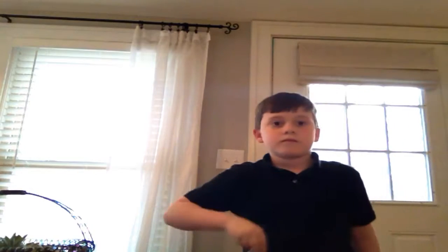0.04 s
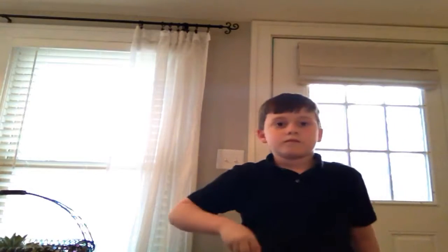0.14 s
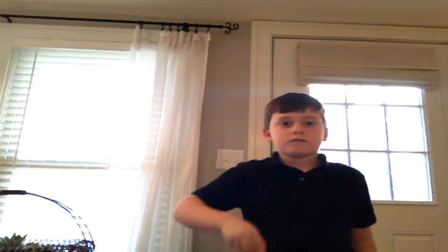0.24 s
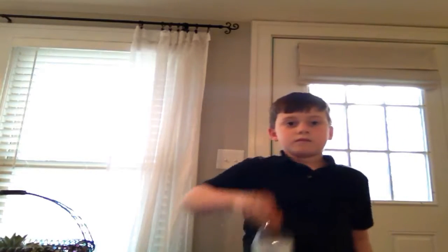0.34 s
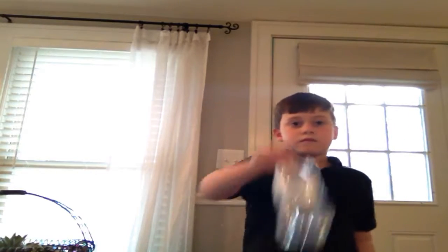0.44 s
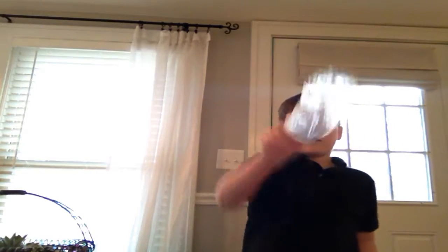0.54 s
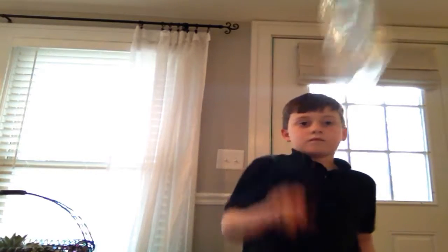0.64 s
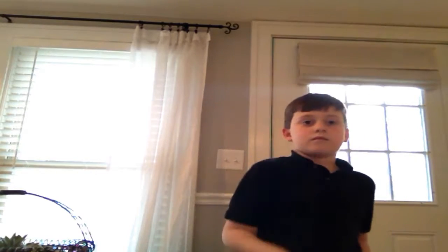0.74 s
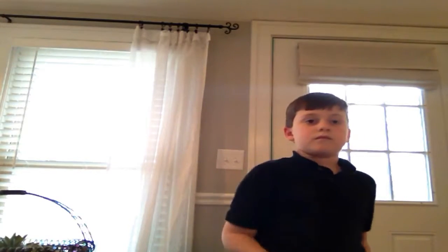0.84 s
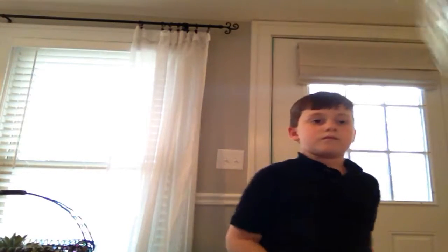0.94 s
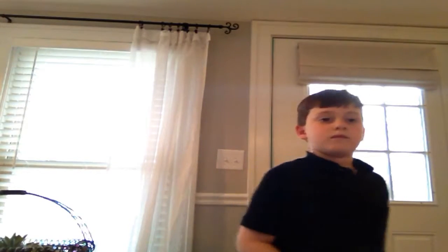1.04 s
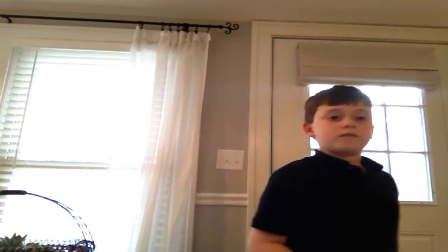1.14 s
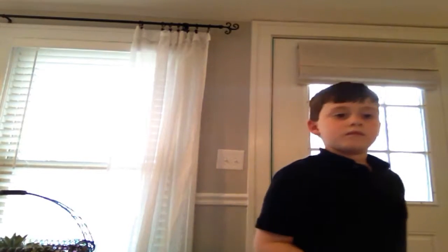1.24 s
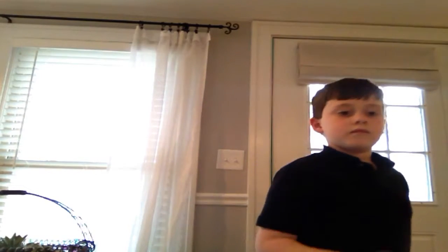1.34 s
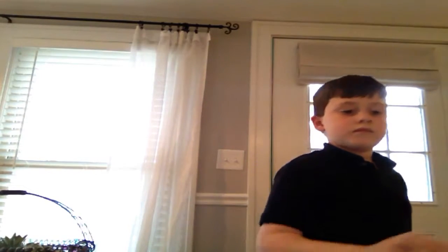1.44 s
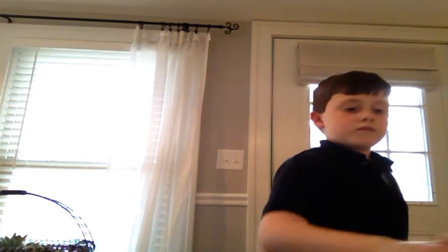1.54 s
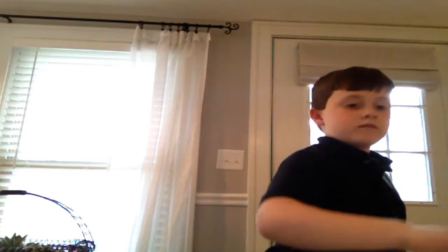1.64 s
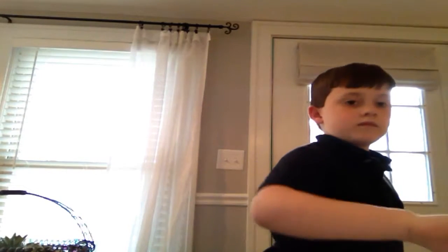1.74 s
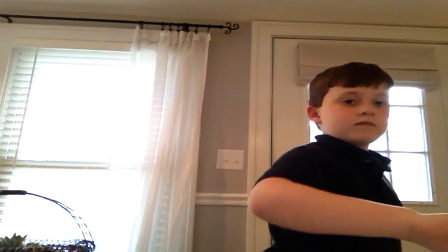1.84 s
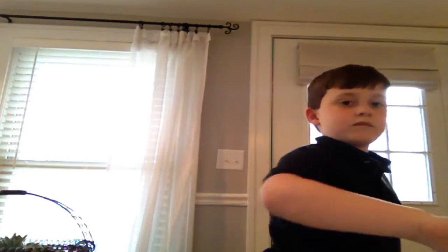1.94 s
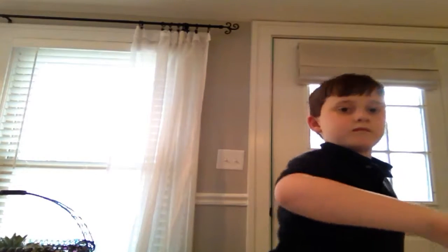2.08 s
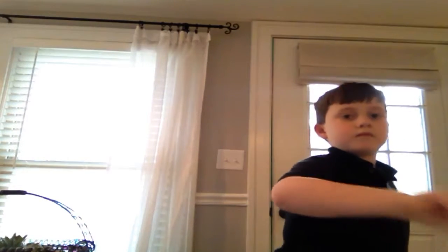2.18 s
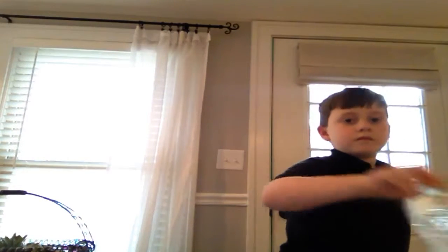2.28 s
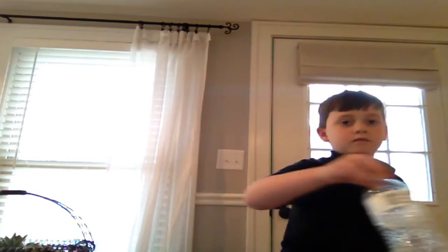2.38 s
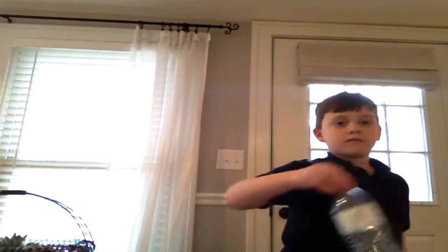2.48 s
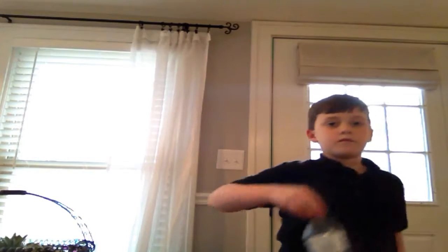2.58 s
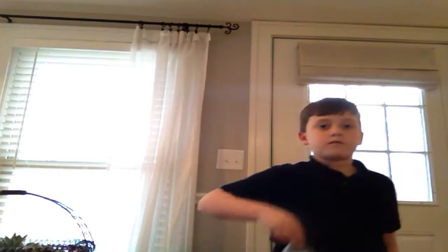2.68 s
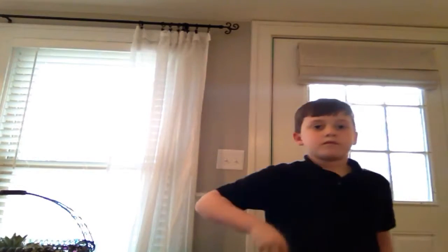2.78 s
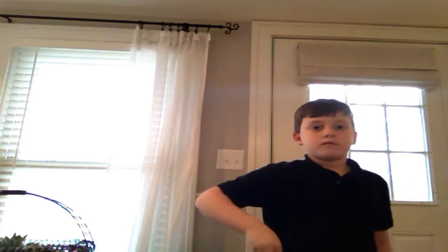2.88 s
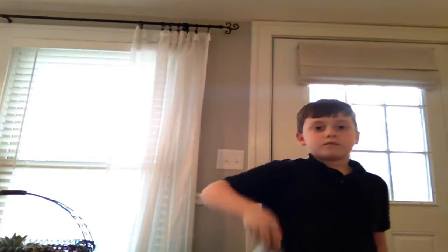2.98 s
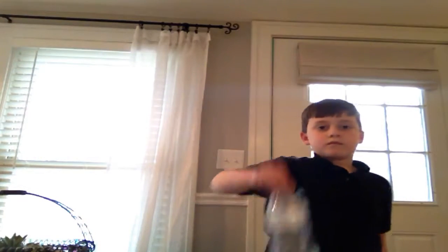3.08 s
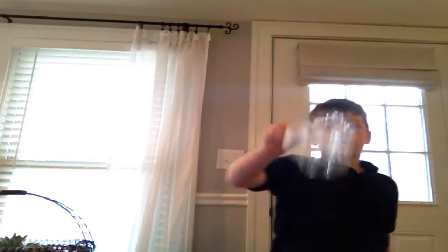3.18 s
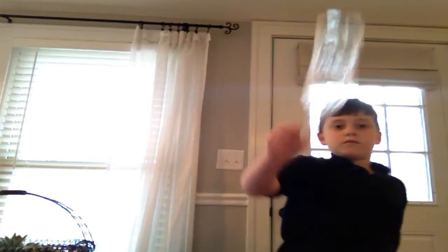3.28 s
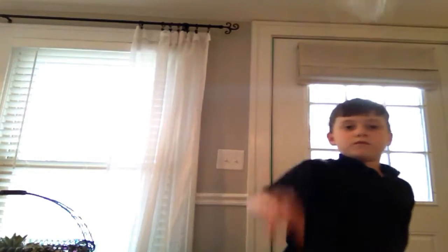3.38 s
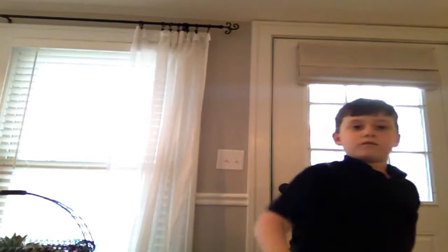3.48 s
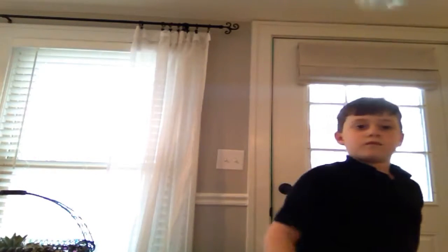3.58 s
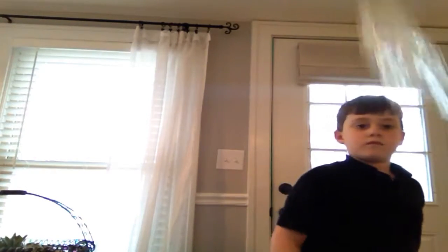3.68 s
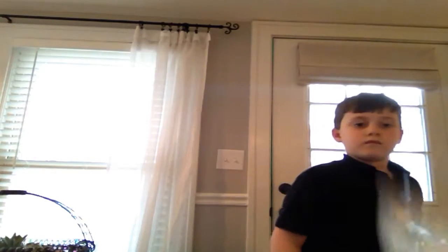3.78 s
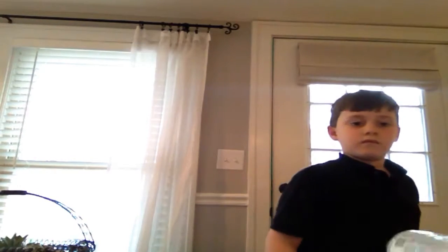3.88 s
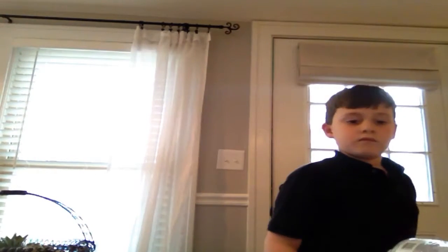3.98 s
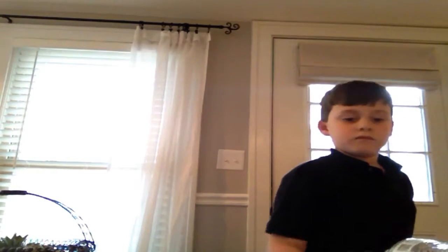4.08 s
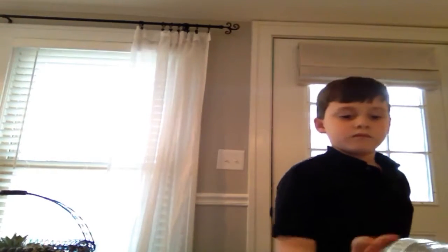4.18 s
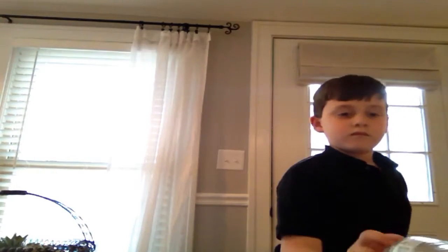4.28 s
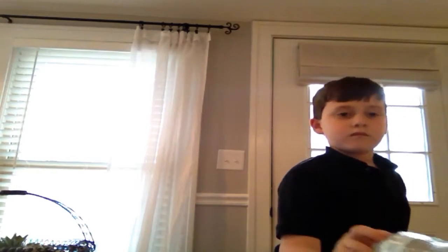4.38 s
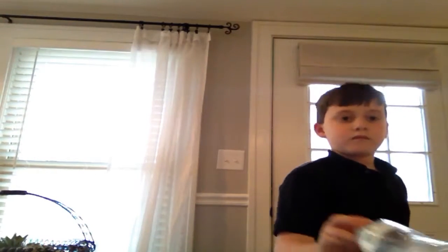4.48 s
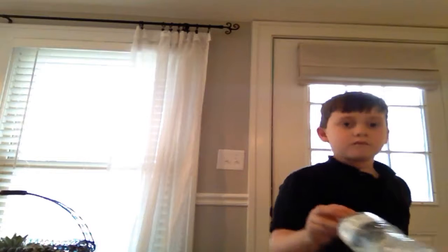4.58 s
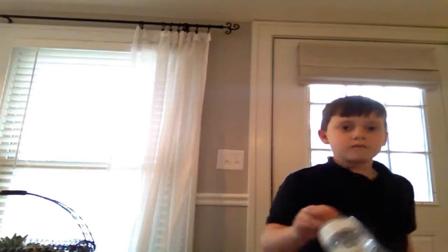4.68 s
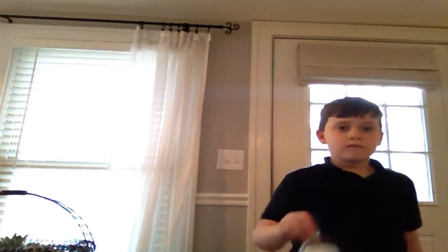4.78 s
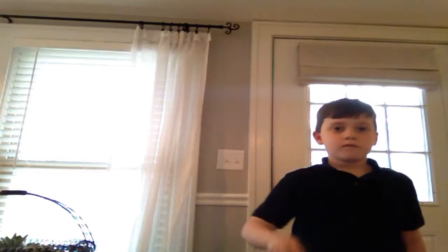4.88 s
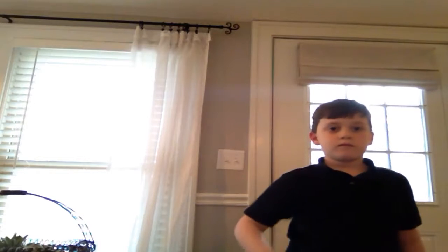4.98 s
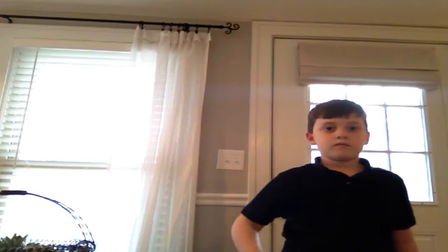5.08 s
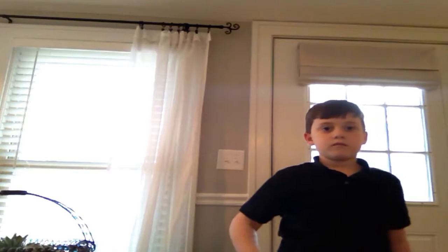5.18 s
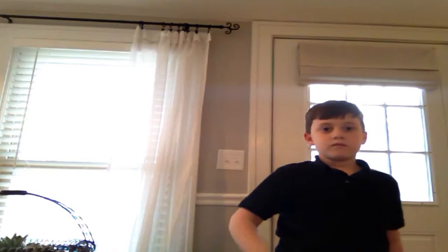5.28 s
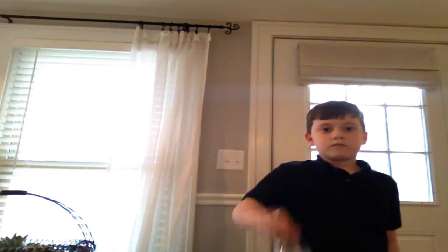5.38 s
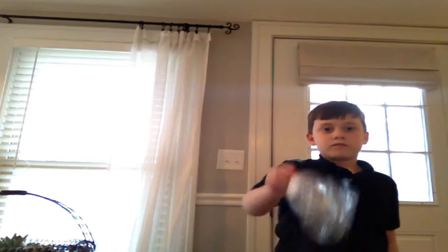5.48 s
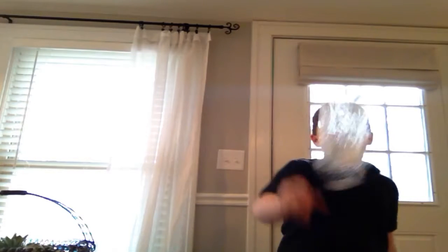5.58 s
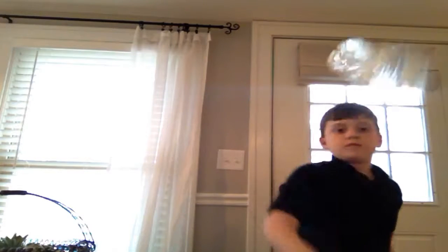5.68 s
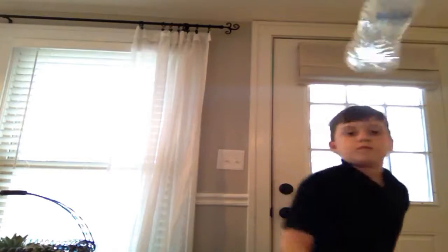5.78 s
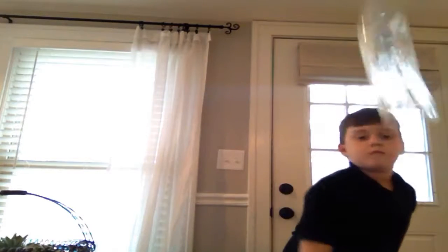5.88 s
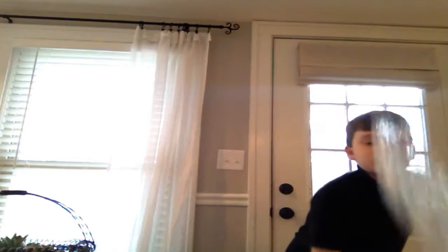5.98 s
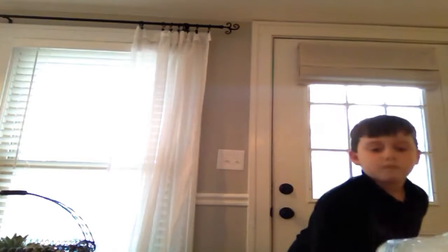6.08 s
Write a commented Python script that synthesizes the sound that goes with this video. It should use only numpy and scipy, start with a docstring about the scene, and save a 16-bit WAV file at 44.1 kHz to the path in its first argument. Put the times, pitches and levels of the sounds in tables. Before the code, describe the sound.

A low appliance hum with a soft fan rush runs throughout in a small, echoing room. At about 0.2 seconds a plastic bottle scuffs faintly on a table, followed by a soft swish. At 1.0 it lands with a sharp plastic crunch, a table thump and a short, hollow slap of water, bouncing more lightly at 1.3. Around 2.1 the shell snaps quietly as it is gripped, and faint rustles follow. The second landing, a loud cluster of cracks and thuds, comes at 3.7, with a small knock at 3.9. Soft rustling and crinkling continue from 4 to 5 seconds, then a few light snaps near 5.5. The third landing hits just before 6.0 with a quick clatter and a last weak tap at 6.1. Very faint drops tick inside the bottle just before each landing, and every impact leaves a brief echo.

```python
"""In a small, echoing room, a partly filled plastic water bottle is flipped onto a table three times.
Each landing crumples the thin shell for a moment, thumps the table top and slams the water into the
base; the bottle bounces and topples. Before and between throws it is scuffed along, gripped and swung,
and drops tick inside it as it flies. An appliance hums steadily in the background."""
import sys
import numpy as np
from scipy import signal
from scipy.fft import rfft, irfft
from scipy.io import wavfile
from scipy.ndimage import uniform_filter1d

SR = 44100
rng = np.random.default_rng(int(sys.argv[2]) if len(sys.argv) > 2 else 0)


def dump_mix(stems):
    """Bounce the given channels to the path in sys.argv[1] as a 16-bit WAV at rate SR."""
    frames = np.atleast_2d(stems).T  # one column per channel
    limited = np.clip(frames, -1, 1)  # hard clip at full scale
    pcm = np.round(limited * 32767).astype(np.int16)
    wavfile.write(sys.argv[1], SR, pcm)


N = 270333

# the bottle hits the table: t/s, crack level/dB, crumple length/s, thump level/dB,
# squareness (0 = on the thin wall, 1 = flat on the stiff base)
HITS = [ (0.997, -14.5, 0.0036, -19.5, 0.96), (1.0006, -7, 0.0043, -18.5, 0.94),
        (1.287, -20.5, 0.0014, -24.5, 0.76), (1.2932, -20, 0.0016, -49, 0.86),
        (3.719, -14, 0.0082, -17.5, 0.38), (3.75, -6, 0.00063, -15, 0.33),
        (3.766, -20, 0.0081, -18.5, 0.67), (3.878, -30, 0.0038, -52, 1), (3.899, -30.5, 0.0026, -25.5, .65),
        (5.9526, -14.5, 0.0046, -25, 0.91), (5.961, -26.5, 0.018, -15.5, 0.5),
        (6.0105, -20, 0.0011, -45, .35), (6.0141, -18.5, .0015, -29, 0.045), (6.032, -26, .002, -50, 0.092),
        (6.1212, -35.5, .0024, -50, 0.37), ]
# the notes the table top rings at, with the bottle on it: f/Hz, level/dB, time to fade by 60 dB/s
TABLE_NOTES = [(105.9, -29, 0.11), (143.8, -10.5, 0.11), (172, -17, 0.24), (230.7, -12, 0.32),
               (280, -9, 0.13), (365, -12.5, 0.14), (379, -13, 0.19), (413, -9.5, 0.22), (505, -6.5, 0.22),
               (564.3, -7, 0.086), (660, -3.5, 0.018), (729.7, -8.5, 0.14), (823, -8, 0.031),
               (1171, -11, 0.05), (1438, -12, 0.12), (1684, -20, 0.062), (1890, 2.5, 0.042)]
# tone of the crumpling shell: f/Hz, level/dB
SHELL_TONE = [(60, -40), (130, -7), (400, 3), (800, 2), (1200, -0.5), (1950, -1), (2400, -4), (2900, -3),
              (3500, -4), (4300, -4), (6200, -12), (7600, -12.5), (9500, -14), (16000, -17)]

def landings(size=32768):
    """Each hit buckles the shell in a burst of clicks and sets the table ringing; the room echoes both."""
    buckle_rise_s, buckle_fade_s = .0003, .02
    out, t = np.zeros(N), np.arange(size) / SR
    table = sum(undb(db) * np.sin(2 * np.pi * hz * t) * fade(t, fade_s) * (-1) ** k
                for k, (hz, db, fade_s) in enumerate(TABLE_NOTES))
    for s, crack_db, crumple_s, thump_db, squareness in HITS:
        # the wall sounds bright and gives way; the base sounds dull and stops at once
        tilt_db = np.interp(squareness, [0, 1], [1, -1.56])
        contact_s = np.interp(squareness, [0, 1], [.0023, .0001])
        # the wall keeps buckling while the bottle is stopped, then dies away quickly
        buckling = (1 - np.exp(-t / buckle_rise_s)) * fade(np.maximum(t - crumple_s, 0), buckle_fade_s)
        shell = undb(crack_db) * np.linalg.norm(buckling) * tone_filter(SHELL_TONE, tilt_db)
        crack = convolve(unit(clicks(size, spread_db=3.0) * buckling), shell)
        # a longer contact is a softer push that leaves out the table's high notes
        push = t * fade(t, 2 * contact_s)
        thump = undb(thump_db) * convolve(table, push / push.sum())
        # every hit falls on a new spot with its own echoes; in them the clicks merge into one crack
        echoes = room_echoes(size)
        add(out, s, crack + thump + convolve(echoes, shell) + convolve(echoes, thump))
    return out


# water slams into the base and a pocket of air rings: t/s, f/Hz, level/dB
AIR_POCKETS = [(.999, 320, -17), (1.005, 546, -10), (1.006, 395.5, -12), (1.288, 840, -21),
               (3.723, 457, -13.5), (3.751, 360, -16.5), (5.958, 320, -21.5), (5.959, 553, -17.5)]

def water_slaps(rise_s=.00081, fade_cycles=30):
    """The water lands with the bottle and rings the air it traps; small, high pockets die sooner."""
    out, t = np.zeros(N), np.arange(SR // 2) / SR
    for s, hz, db in AIR_POCKETS:
        loudness = undb(db) * (1 - np.exp(-t / rise_s)) * fade(t, fade_cycles / hz)
        add(out, s, loudness * np.sin(2 * np.pi * hz * t))
    return out


# the shell snaps as it is gripped, settles or is let go: t/s, level/dB, f/Hz, sharpness (Q)
SNAPS = [(2.038, -37.5, 660, 3.4), (2.04, -43, 1540, 2), (2.074, -44, 1990, 1.5), (2.096, -39, 3110, 1.6),
         (2.097, -41, 1655, 3), (3.925, -47.5, 6660, 13), (4.429, -47.5, 3960, 5), (5.469, -44, 1970, 1.2),
         (5.486, -39.5, 2700, 2.2), (5.4888, -40.5, 4086, 24), (5.488, -47, 5720, 8)]

def shell_snaps():
    """The clearest snaps of the plastic, each ringing one patch of the shell."""
    out = np.zeros(N)
    for s, db, hz, q in SNAPS:
        add(out, s, undb(db) * tick(hz, q))
    return out


def tick(hz, q, size=4096):
    """A patch of shell rings; the more it flexes (low q), the more it wavers and the sooner it dies."""
    t, width_hz = np.arange(size) / SR, hz / q
    wander = np.cumsum(rng.standard_normal(size)) * np.sqrt(2 * np.pi * width_hz / SR)
    ring = resonate(np.sin(2 * np.pi * hz * t + wander), hz, 2 * width_hz)
    return ring / ring.std() * fade(t, fade_s=.027 * q ** .22)


# the base scuffs back and forth: loudest t/s, level/dB, ring f/Hz, ring level before halving/dB
SCUFF_STROKES = [(.201, -46, 5000, 6.5), (.335, -44.5, 2037, 10)]
# tone of the rubbing: f/Hz, level/dB
SCUFF_TONE = [(300, -8.5), (900, 5.5), (1250, -2), (1700, 2), (2400, -2.5), (2750, 2.5), (3500, 0.5),
              (4700, 3.5), (6000, 0), (7500, 1.5), (11000, 0), (16000, -4.5)]

def scuffs(q=2.1):
    """Rubbing on the table makes fine clicks; the shell rings differently on the pull and the push."""
    out = np.zeros(N)
    for s, db, hz, ring_db in SCUFF_STROKES:
        rub = convolve(clicks(N, spread_db=2.0), tone_filter(SCUFF_TONE))
        ring = undb(ring_db) * resonate(rub, hz, hz / q) / 2
        out += undb(db) * stroke(s, rise_s=.021, fall_s=.076) * (rub + ring)
    return out


# the arm moves the bottle, rustling and sloshing: loudest t/s, length/s, level/dB, f/Hz
ARM_MOVES = [(0.463, 0.057, -54.5, 3370), (2.163, 0.16, -58, 2300), (2.276, .045, -59.5, 5000),
             (2.42, .09, -63.5, 1370), (3.15, 0.036, -56, 3670), (3.648, .11, -54, 1500),
             (4.03, 0.035, -54.5, 4200), (4.173, 0.25, -64, 2000), (4.452, 0.2, -59, 2500),
             (4.885, 0.058, -61.5, 3300)]

def rustles(crinkles_per_move=3, swish_q=1.7):
    """A soft, grainy swish follows each arm movement, and the gripped shell crinkles at random."""
    crinkle_db, spread_db, spread_octaves = -3.5, 5.5, .502  # compared with the swish
    out, grain = np.zeros(N), clicks(N, spread_db=7.5)
    for s, length_s, db, hz in ARM_MOVES:
        rise_s = .33 * length_s  # the arm speeds up faster than it slows
        swish = resonate(grain, hz, hz / swish_q)
        out += undb(db) * stroke(s, rise_s, length_s - rise_s) * swish / swish.std()
        for when, strength, pitch in rng.uniform(-1.1, 1, (crinkles_per_move, 3)):
            gain = undb(db + crinkle_db + spread_db * strength)
            crinkle = tick(hz * 2 ** (spread_octaves * pitch), q=3.1)
            add(out, s - rise_s + length_s * (1 + when) / 2, gain * crinkle)
    return out


# the bottle tumbles down through the air: start t/s, end t/s
FLIGHT_TIMES = [(.82, .92), (3.46, 3.62), (5.76, 5.94)]

def drips(drops_per_flight=3, level_db=-55, middle_hz=4600, spread_octaves=.6):
    """A few drops strike the bottle's wall at random moments of each flight."""
    out = np.zeros(N)
    for start_s, end_s in FLIGHT_TIMES:
        for when, pitch in rng.random((drops_per_flight, 2)):
            hz = middle_hz * 2 ** (spread_octaves * (2 * pitch - 1))
            add(out, start_s + when * (end_s - start_s), undb(level_db) * tick(hz, q=7))
    return out


# how long the room echoes: f/Hz, time to fade by 60 dB/s
ECHO_TIMES = [(120, 0.622), (500, 0.56), (2000, 0.63), (5000, 0.65), (9000, 0.48), (16000, .3)]
# how strongly the room echoes: f/Hz, level/dB
ECHO_LEVELS = [(120, -4), (400, 2), (1000, -2.5), (3000, -5.5), (8000, -3.5), (16000, -11)]

def room_echoes(size=32768, early_db=8, early_fade_s=.37):
    """Near surfaces answer first and loudest; a wash of echoes follows and loses its top treble first."""
    t = np.arange(size) / SR
    spectrum, hz = rfft(rng.standard_normal(size)), np.fft.rfftfreq(size, 1 / SR)
    centres_hz = np.geomspace(125, 16000, 8)
    build_up = np.clip((t - .003) / .0055, 0, 1) * (1 + undb(early_db) * fade(t, early_fade_s))
    echoes = np.zeros(size)
    for centre, weights in zip(centres_hz, np.eye(len(centres_hz))):
        band = irfft(spectrum * look_up(np.c_[centres_hz, weights], hz))
        decay = unit(build_up * fade(t, look_up(ECHO_TIMES, centre)))
        echoes += undb(look_up(ECHO_LEVELS, centre)) * band * decay
    return echoes


# the notes of the hum: multiple of the mains frequency, level/dB
HUM_NOTES = [(2, -73.5), (4, -49.5), (6, -63), (8, -62.5)]
# tone of the fan's rush and hiss: f/Hz, level/dB
FAN_TONE = [(30, -45), (45, -35), (60, -18.5), (95, -29.5), (115, -5), (145, 1), (190, -8), (280, -2),
            (420, -7), (600, -14), (1000, -19), (2200, -26), (5000, -30), (16000, -32.5)]

def appliance(mains_hz=59.95, fan_db=-53.5):
    """A motor hums on mains power and wavers a little, over the rush of its fan."""
    hum, t = np.zeros(N), np.arange(N) / SR
    for multiple, db in HUM_NOTES:
        gain = undb(db + 1.6 * drift(rate_hz=11)) * np.sqrt(2)
        hum += gain * np.sin(2 * np.pi * (round(multiple) * mains_hz * t + rng.random()))
    rush = convolve(rng.standard_normal(N), tone_filter(FAN_TONE))
    return hum + rush * undb(fan_db + .73 * drift(rate_hz=8.5))


def undb(db):
    """Turn decibels into a number to multiply by."""
    return 10 ** (np.asarray(db) / 20)


def look_up(points, hz):
    """Read between the rows of a (frequency, value) table, with octaves evenly spaced."""
    f, value = np.transpose(points)
    return np.interp(np.log(np.maximum(hz, 1)), np.log(f), value)


def unit(x):
    """Scale a sound so that its energy is 1."""
    return x / np.sqrt(np.sum(x ** 2))


def add(track, s, sound):
    """Mix a sound into the track at s seconds."""
    i = max(int(s * SR), 0)
    track[i:i + len(sound)] += sound[:max(len(track) - i, 0)]


def convolve(x, response):
    """Pass a sound through a filter, keeping its length."""
    return signal.fftconvolve(x, response)[:len(x)]


def tone_filter(points, tilt_db=0, size=4096):
    """Make a filter from a tone table, brighter by tilt_db for each octave up."""
    hz = np.maximum(np.fft.rfftfreq(size, 1 / SR), 20)
    cepstrum = irfft(np.log(undb(look_up(points, hz) + tilt_db * np.log2(hz))))
    # fold it so that the filter rings only after a click, never before
    cepstrum[1:size // 2] *= 2
    cepstrum[size // 2 + 1:] = 0
    return unit(irfft(np.exp(rfft(cepstrum))))


def resonate(x, hz, width_hz):
    """Keep the part of a sound that lies near one pitch."""
    return signal.lfilter(*signal.iirpeak(hz, hz / width_hz, fs=SR), x)


def clicks(count, spread_db):
    """Tiny, tightly packed clicks of uneven size."""
    x = rng.standard_normal(count) * undb(spread_db * rng.standard_normal(count))
    return x / x.std()


def drift(rate_hz):
    """A slow random wobble, about 1 in size."""
    hold = int(SR / rate_hz)
    steps = np.repeat(rng.standard_normal(N // hold + 1), hold)
    smooth = uniform_filter1d(uniform_filter1d(steps, hold), hold)[:N]
    return smooth / smooth.std()


def stroke(peak_s, rise_s, fall_s):
    """The speed of one hand movement: it swells and dies away."""
    t = np.arange(N) / SR - peak_s
    return np.exp(-(t / np.where(t < 0, rise_s, fall_s)) ** 2)


def fade(t, fade_s):
    """Die away by 60 dB every fade_s seconds."""
    return np.exp(-np.log(1000) * t / fade_s)


def scene():
    """The bottle and its echoes in the room, over the hum."""
    hits, hum = landings(), appliance()
    small_sounds = water_slaps() + shell_snaps() + scuffs() + rustles() + drips()
    return (hits + small_sounds + convolve(small_sounds, room_echoes()) + hum)[None]


def record(dry, ceiling=.82, bottom_hz=62, top_hz=15900):
    """A small microphone rounds off loud peaks and loses the deepest bass and the highest treble."""
    rounded = dry / (1 + (dry / ceiling) ** 4) ** (1 / 4)
    thin = signal.sosfilt(signal.butter(4, bottom_hz, "highpass", fs=SR, output="sos"), rounded)
    return signal.sosfilt(signal.ellip(10, .2, 80, top_hz, fs=SR, output="sos"), thin)


dry = scene()
out = record(dry)
dump_mix(out)
```